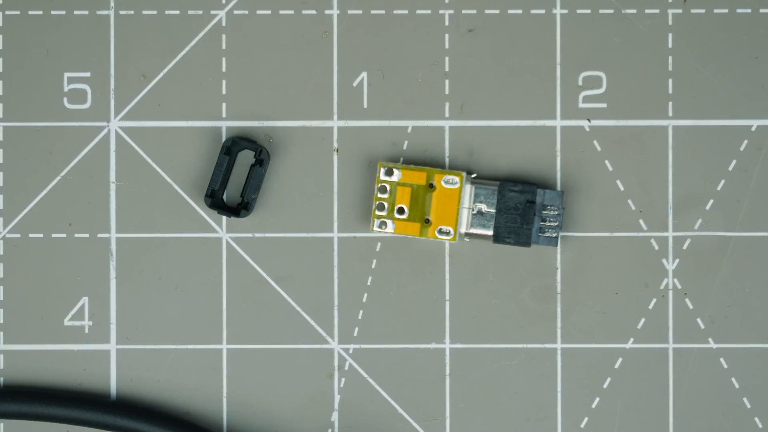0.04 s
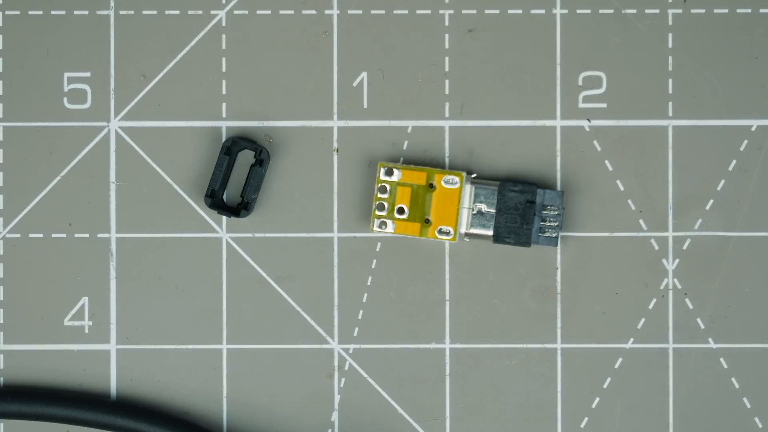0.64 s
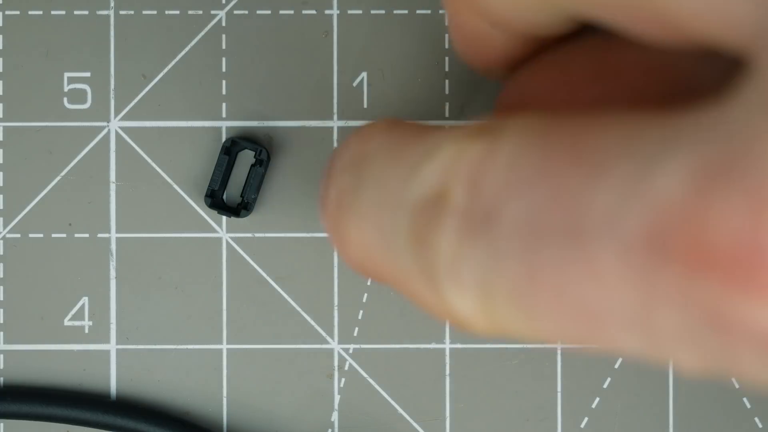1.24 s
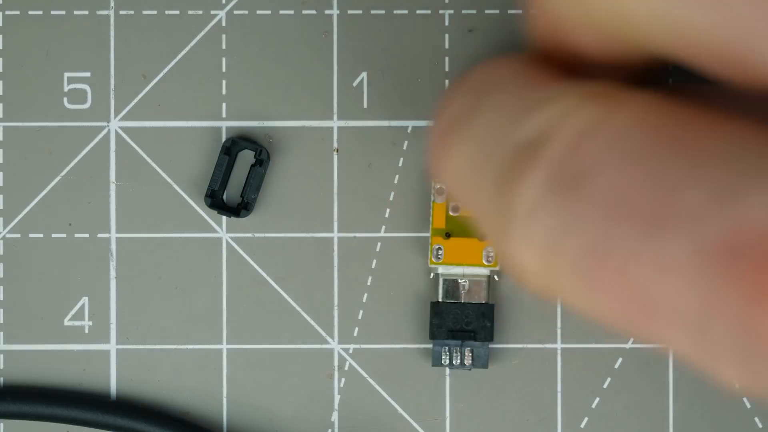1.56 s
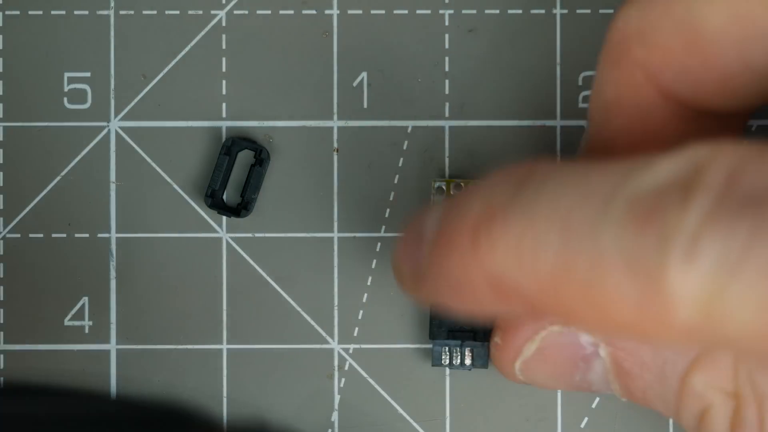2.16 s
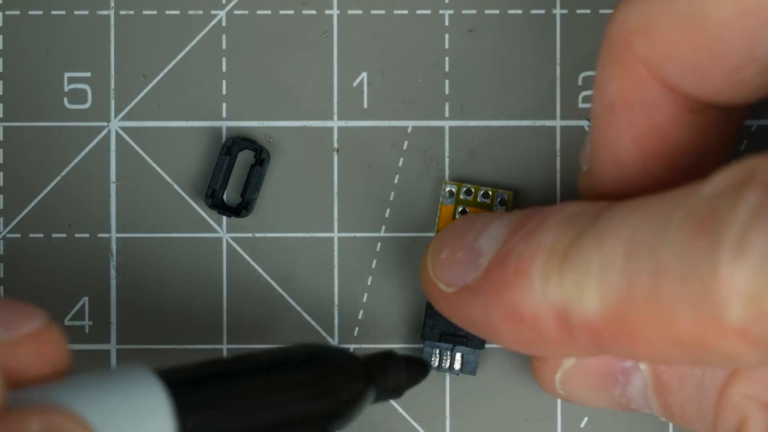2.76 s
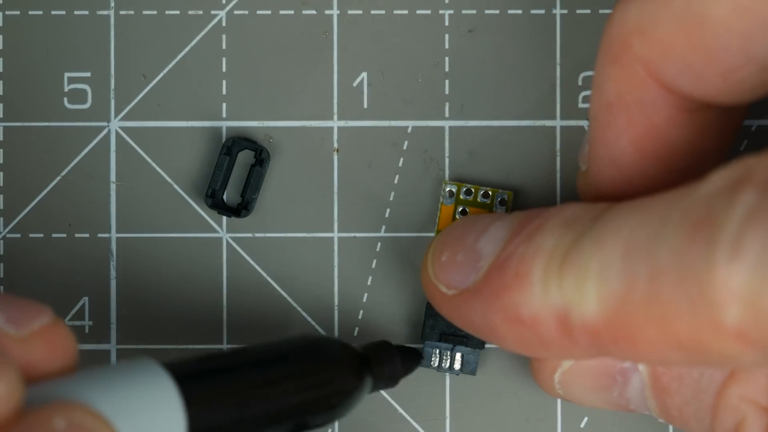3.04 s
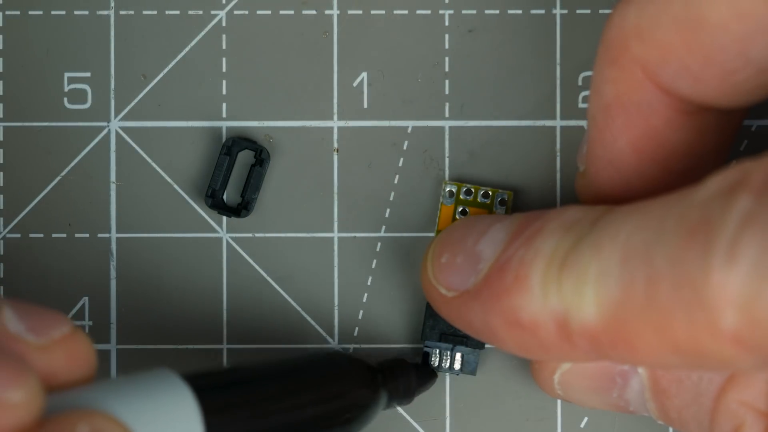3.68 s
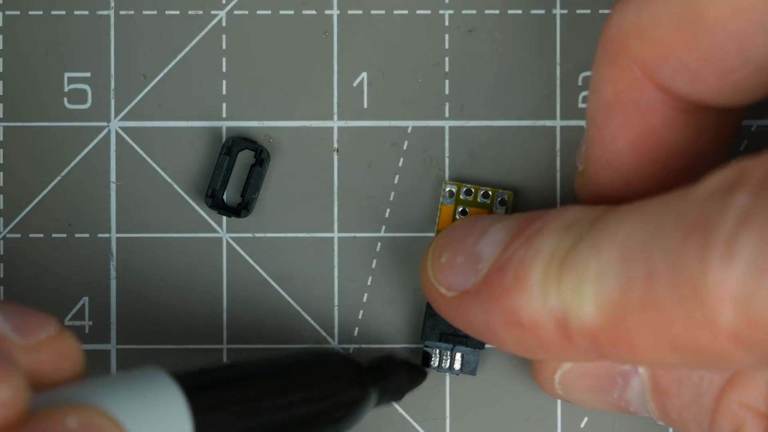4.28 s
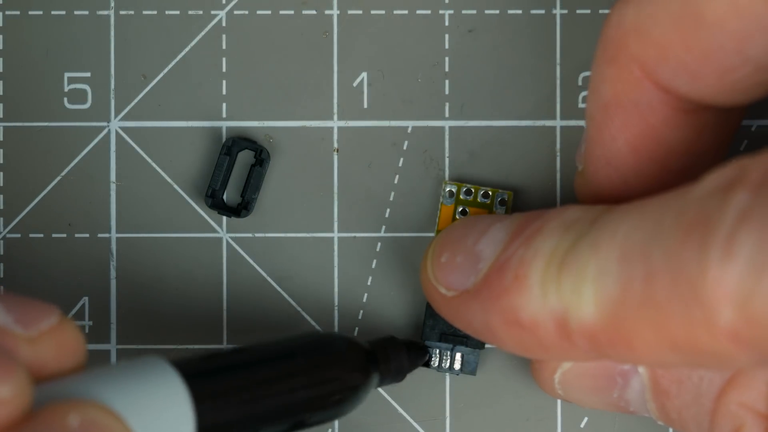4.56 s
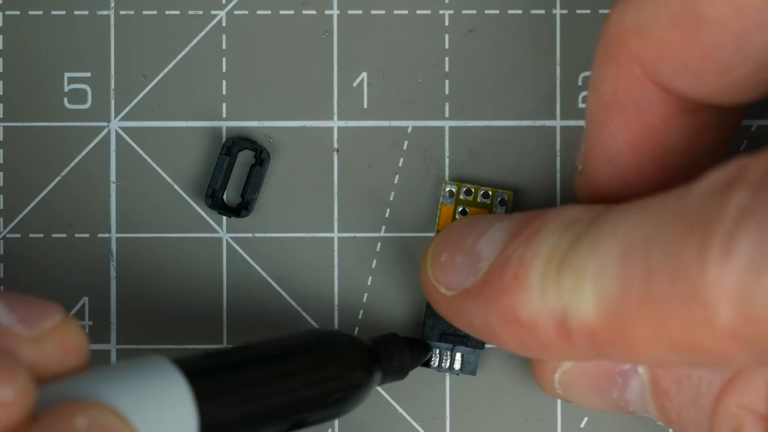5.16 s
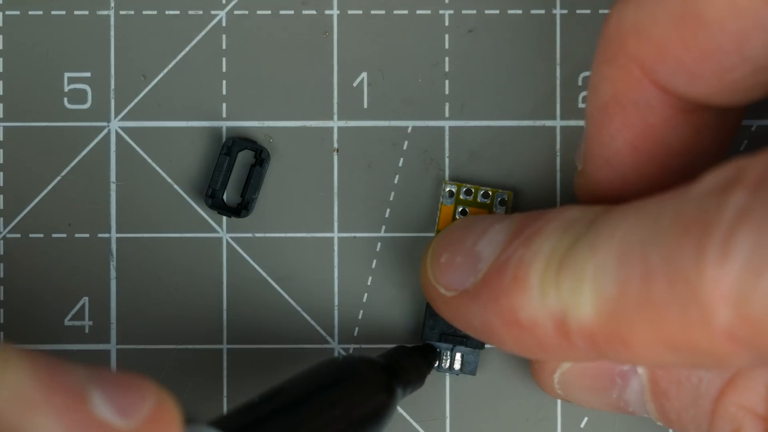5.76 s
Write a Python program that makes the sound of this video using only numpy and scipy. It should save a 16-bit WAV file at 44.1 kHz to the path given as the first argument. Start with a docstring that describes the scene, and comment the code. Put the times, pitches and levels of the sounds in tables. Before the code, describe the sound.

The sounds are close to the microphone, at a desk in a small room with low rumble and faint hiss. After a few light ticks, a marker's cap snaps off at about 0.4 seconds with a sharp click and a low thump, by far the loudest moment. Small rattles, scrapes and brief squeaks of the cap between fingers follow until 0.9 seconds. A tiny plug is turned on a mat, ticking with a slight metallic ring at 1.1 and 1.6 seconds, then more faintly until 2.5. A palm drags softly and hands bump the desk from about 2.4 to 3 seconds. Between 3.6 and 5 seconds the felt tip makes a few faint, scratchy dabs at the plug amid soft arm movements. At 5.6 seconds the marker's barrel gives one dull knock.

```python
"""A desk with a cutting mat in a small, rumbling room, close to the microphone.
A marker's cap snaps off, scrapes the barrel and squeaks between the fingers. A tiny plug is turned and
pressed down, the felt nib dabs at it, and the marker knocks once. Hands rub and bump the desk softly.
Clicks are contacts ringing a body's modes, scrapes are random micro-slips; the room answers both."""
import sys
import numpy as np
from scipy import signal
from scipy.fft import rfft, irfft, next_fast_len
from scipy.io import wavfile
from scipy.ndimage import uniform_filter1d

SR = 44100
rng = np.random.default_rng(int(sys.argv[2]) if len(sys.argv) > 2 else 0)


def transcribe(signal):
    """Save signal, clipped to [-1, 1], as a 16-bit WAV file at the path in sys.argv[1]."""
    frames = np.atleast_2d(signal).T
    limited = np.clip(frames, -1, 1)
    pcm = np.round(limited * 32767).astype(np.int16)
    wavfile.write(sys.argv[1], SR, pcm)


N = 265349
T = np.arange(N) / SR

# contacts: start_s, level_db, bright_hz, spread_oct
CAP_HITS = [(0.064, -39, 4796, 0.22), (0.198, -48.5, 4760, 0.36), (0.3888, -20, 4500, 1.5),
            (0.3903, -12.5, 1840, 0.74), (0.3924, -4, 1500, 1.47), (0.3927, -4, 9200, 0.29),
            (0.3947, -7, 6000, 0.59), (0.3950, -12, 5913, 0.33), (0.3956, -8.5, 4000, 0.34),
            (0.4025, -23, 9095, .4), (0.428, -27.5, 1200, 0.98), (0.490, -31, 1590, 1.3),
            (0.583, -28, 7800, 0.36), (0.595, -28, 7500, .7), (0.6935, -38.5, 2800, 1.23),
            (0.846, -39.5, 4500, 0.45)]  # two ticks, snap over the ridge, rattle
PING_HITS = [(0.2549, -22, 9170, .9), (0.2560, -30, 8266, 0.28)]  # cap shifting in its seat
PLUG_HITS = [(1.1177, -33.5, 2630, 1.9), (1.1306, -33, 8700, 0.22), (1.1327, -29, 4600, 1.1),
             (1.4055, -48, 3000, 0.78), (1.6027, -25, 3100, 1.2), (1.6046, -33, 3860, 1.1),
             (2.025, -51.5, 9040, 0.57), (2.068, -51, 9920, 0.56), (2.337, -49, 1001, 1),
             (2.3505, -42.5, 8420, 0.092), (2.408, -48.5, 1100, 1.5), (2.461, -52.5, 998, 1.02),
             (3.750, -46.5, 4000, 2.3), (4.751, -54.5, 998, .8), (5.618, -47, 5800, 1.46)]  # plug on fingernail, mat and marker
KNOCK_HITS = [(5.6148, -24.5, 1020, 1.22), (5.6187, -32.5, 1240, 1.25), (5.6232, -38.5, 1500, 0.94)]  # barrel

# body resonances: centre_hz, width_hz, level_db
CAP_MODES = [(128.7, 30, -6.5), (496.3, 93, -5), (959, 88, -4), (1250, 110, -8.5), (1500, 110, -7),
             (1877, 73, -3.5), (2140, 300, -1.5), (2650, 300, -5.5), (3570, 160, -9), (3965, 140, -1),
             (4630, 300, -7), (5000, 350, -9.5), (5440, 250, -2), (6200, 310, -3.5), (6350, 200, -12.5),
             (7200, 410, -5.5), (8365, 900, -8), (9600, 130, -2.5), (10660, 900, -7.5),
             (14700, 3700, -13.5)]
PING_MODES = [(5000, 1500, -9), (7500, 520, -5), (7670, 150, 1), (9600, 600, -10.5), (10500, 500, -9.5),
              (12300, 700, -13)]
PLUG_MODES = [(685, 103, 10.5), (2140, 150, -6), (2940, 620, -8.5), (3530, 300, -4), (4000, 250, -17),
              (4820, 360, -2.5), (5600, 400, -4.5), (6810, 320, 5), (8940, 780, -6), (11700, 1000, -9.5)]
BARREL_MODES = [(410, 31, 6.5), (787, 150, -27), (1028, 65, -1.5), (1250, 105, -9.5), (1430, 86, -9.5),
                (1660, 78, -7.5), (1970, 48, -5.5), (3260, 82, -10.5)]
# plug's metal shell: pitch_hz, level_db, t60_s
SHELL_MODES = [(4005, -35.5, 0.54), (7000, -29, 0.33), (8420, -28, 0.15)]

# bell-shaped strokes: centre_s, sigma_s, level_db
FINGER_RUBS = [(0.1, 0.33, -63.5), (0.6, 0.16, -56.5), (1.0, 0.19, -67), (1.8, 0.16, -64.5),
               (2.66, 0.117, -68)]  # on cap and plug
CAP_SCRAPES = [(0.096, 0.003, -59), (0.607, 0.016, -51), (0.695, 0.005, -50), (0.740, 0.007, -50.5),
               (0.762, .005, -61), (0.848, 0.0051, -55), (0.897, 0.0057, -57)]  # along the barrel
CAP_SQUEAKS = [(0.588, 0.0038, -47), (0.609, 0.012, -50.5), (0.697, 0.0027, -41.5)]  # on the fingers
PLUG_SCUFFS = [(1.124, 0.0077, -59), (1.415, .005, -57), (1.515, 0.016, -67.5), (2.349, 0.0038, -57)]  # over the mat
PALM_DRAGS = [(1.84, 0.014, -67), (2.422, 0.017, -58), (2.565, 0.016, -57.5), (2.612, 0.009, -49.5),
              (2.64, 0.0072, -51), (2.75, 0.026, -55), (3.79, 0.058, -72.5)]  # over the mat
NIB_DABS = [(3.642, 0.015, -58.5), (3.754, 0.0061, -47.5), (4.282, 0.009, -54), (4.648, 0.01, -60.5),
            (4.93, 0.0072, -68.5)]  # at the plug
# arm movements: centre_s, sigma_s, desk_db, sleeve_db
ARM_MOVES = [(0.15, 0.14, -53, -59), (0.763, .05, -47, -70), (1.814, 0.078, -51, -65.5),
             (2.713, 0.09, -49.5, -69), (3.206, 0.12, -52.5, -86), (3.775, 0.072, -45, -59.5),
             (4.564, 0.049, -47.5, -75.5), (4.862, 0.068, -53, -65.5), (5.344, 0.055, -50, -71),
             (5.766, .06, -48, -66)]
# low thumps of the desk: start_s, level_db, pitch_hz, t60_s (hand bumps, plus the thumps of the cap's snap and
# the knock)
DESK_BUMPS = [(0.392, -14.5, 116, 0.02), (0.396, -34.5, 67, 0.17), (0.431, -38, 347.4, 0.05),
              (0.692, -30, 55, 0.13), (2.654, -46.5, 125.8, 0.38), (2.766, -41.5, 70.8, 0.35),
              (3.019, -40.5, 61.7, 0.34), (3.764, -51, 273, 0.3), (5.614, -37, 212, 0.016),
              (5.697, -48, 135, 0.24)]

# noise spectra: freq_hz, level_db
HISS_SPECTRUM = [(100, -6), (200, -1.5), (330, -12), (600, -11), (1100, -13.5), (3000, -23.5), (8000, -20),
                 (15500, -20.5)]
RUMBLE_SPECTRUM = [(8, -7.5), (20, 3), (42, -1), (62, -9), (85, -13.5), (120, -19), (200, -33), (400, -74)]
SLEEVE_SPECTRUM = [(50, -34), (120, 1), (190, -3), (280, -3.5), (450, -12), (900, -23.5), (2000, -56.5)]
SKIN_SPECTRUM = [(150, -11.5), (450, -1), (1000, -8), (2300, -11), (5500, -15), (9000, -14.5), (15000, -26)]
SCRAPE_SPECTRUM = [(1500, -25.5), (3200, -15), (4500, -6), (5600, 1.5), (6800, 0.5), (8200, 0.5),
                   (10500, -9), (12000, -18), (16000, -28.5)]
SCUFF_SPECTRUM = [(400, -4), (900, -4), (1600, -6), (2300, 6), (3300, -1.5), (4200, -1.5), (6000, -10.5),
                  (12000, -26.5)]
MAT_SPECTRUM = [(100, -8.5), (250, -7), (360, -2), (440, 11.5), (520, -5), (1000, -12.5), (2500, -28.5),
                (6000, -46.5), (14000, -49)]
NIB_SPECTRUM = [(150, -15), (300, 5.5), (900, 7.5), (2000, -14), (3500, -7), (5000, -19.5), (6800, -5),
                (8000, -9.5), (9300, 4), (10500, -9), (12500, -10), (16000, -18)]

# room decay: freq_hz, t60_s
ROOM_DECAY = [(150, 0.25), (800, 0.47), (2000, 0.5), (5500, 0.33), (9000, 0.31), (15000, .33)]
# standing waves over the desk: freq_hz, gain_db
STANDING_WAVES = [(100, 0.5), (135, -2.5), (215, -0.5), (250, 1), (300, 1.5), (338, -4), (390, 3.5),
                  (440, 1), (505, -3), (585, 2.5), (680, -3), (790, 1), (1000, 0.5)]


def amp(db):
    """Decibels to gain."""
    return 10 ** (np.asarray(db) / 20)


def unit_rms(x):
    """Scale to rms 1."""
    return x / np.sqrt(np.mean(x ** 2) + 1e-20)


def log_interp(points, hz):
    """Interpolate (freq_hz, value) points on a log frequency axis."""
    freq_hz, values = np.transpose(points)
    return np.interp(np.log(hz + 1), np.log(freq_hz + 1), values)


def filtered(x, response):
    """Zero-phase filter with gain response(hz)."""
    size = next_fast_len(N + SR // 2)
    return irfft(rfft(x, size) * response(np.fft.rfftfreq(size, 1 / SR)), size)[:N]


def coloured(x, spectrum):
    """Filter by a (freq_hz, level_db) curve."""
    return filtered(x, lambda hz: amp(log_interp(spectrum, hz)))


def noise(spectrum):
    """Coloured noise, rms 1."""
    return unit_rms(coloured(rng.standard_normal(N), spectrum))


def add(track, start_s, sound):
    """Mix a sound in at start_s."""
    part = track[round(start_s * SR):][:len(sound)]
    part += sound[:len(part)]


def swells(strokes, rest_db):
    """Gain over time: bell-shaped swells above a resting level."""
    power = sum(amp(db) ** 2 * np.exp(-((T - centre_s) / sigma_s) ** 2)
                for centre_s, sigma_s, db in strokes)
    return np.sqrt(amp(rest_db) ** 2 + power)


def ring(modes, bright_hz, spread_oct, rolloff, size=4096):
    """Body response, peak 1, to a contact favouring the modes near bright_hz."""
    hz = np.fft.rfftfreq(size, 1 / SR) + 1
    power = sum(amp(db) ** 2 * (hz * width_hz) ** 2
                / ((centre_hz ** 2 - hz ** 2) ** 2 + (hz * width_hz) ** 2)
                for centre_hz, width_hz, db in modes)
    contact = (1 + (np.log2(hz / bright_hz) / spread_oct) ** 2) ** -rolloff
    cepstrum = irfft(np.log(np.sqrt(power) * contact + 1e-9))
    wave = irfft(np.exp(rfft(2 * cepstrum[:size // 2], size)))  # minimum phase
    return wave / np.abs(wave).max()


def echoes(near_db, near_t60_s, room_db):
    """Two impulse responses: direct sound plus scatter from things on the desk; room tail."""
    hz = np.fft.rfftfreq(256, 1 / SR)
    t = T[:SR // 2]
    frames_s = t[::128]
    decay = amp(-60 * frames_s / log_interp(ROOM_DECAY, hz)[:, None])
    bins = rng.standard_normal((len(hz), 2 * len(frames_s))).view(complex)
    tail = signal.istft(bins * decay)[1]
    t = t[:len(tail)]
    tail *= 1 - np.exp(-t / 0.0033)
    scatter = rng.standard_normal(len(t)) * amp(-60 * t / near_t60_s) * (1 - np.exp(-t / 0.0006))
    near = (t == 0) + amp(near_db) * scatter / np.linalg.norm(scatter)
    return near, amp(room_db) * tail / np.linalg.norm(tail)


def clicks(hits, modes, rolloff, grind_db, near_db, near_t60_s, room_db, blur):
    """Each contact strikes, grinds for about 1 ms and rings the body."""
    out, t = np.zeros(N), T[:128]
    # the room hears all sides of the body at once: each mode widens by blur * hz
    blurred = [(hz, width_hz + hz * blur, db + 10 * np.log10(width_hz / (width_hz + hz * blur)))
               for hz, width_hz, db in modes]
    previous_s = -np.inf
    for start_s, db, bright_hz, spread_oct in hits:
        if start_s - previous_s > 0.02:  # closer contacts share their echoes
            near, tail = echoes(near_db, near_t60_s, room_db)
        previous_s = start_s
        grind = rng.standard_normal(len(t)) * t * np.exp(-(t / 0.0007) ** 2)
        force = (t == 0) + amp(grind_db) * grind / np.linalg.norm(grind)
        direct = np.convolve(force, ring(modes, bright_hz, spread_oct, rolloff))
        diffuse = ring(blurred, bright_hz, spread_oct, rolloff)
        diffuse *= np.linalg.norm(direct) / np.linalg.norm(diffuse)
        add(out, start_s, amp(db) * signal.fftconvolve(direct, near))
        add(out, start_s, amp(db) * signal.fftconvolve(diffuse, tail))
    return out


def friction(strokes, spectrum, slips_per_s, room_db):
    """Random micro-slips, coloured by the surface, swell and fade with each stroke."""
    force = np.zeros(N)
    for centre_s, sigma_s, db in strokes:
        u = np.arange(-np.pi, np.pi, 1 / (sigma_s * SR))
        add(force, centre_s - np.pi * sigma_s, amp(db) * np.exp(-u ** 2 / 2))
    slips = rng.standard_normal(N) * (rng.random(N) < slips_per_s / SR)
    rub = force * unit_rms(coloured(slips, spectrum))
    return signal.fftconvolve(rub, sum(echoes(near_db=-20, near_t60_s=0.062, room_db=room_db)))[:N]


def background(hiss_db=-68, rumble_db=-57):
    """Steady hiss over the room's low rumble."""
    return amp(hiss_db) * noise(HISS_SPECTRUM) + amp(rumble_db) * noise(RUMBLE_SPECTRUM)


def hands():
    """Arms shake the desk and brush a sleeve over it; fingers rub, the palm drags."""
    moves = np.array(ARM_MOVES)
    desk = swells(moves[:, [0, 1, 2]], rest_db=-59) * noise(RUMBLE_SPECTRUM)
    sleeve = swells(moves[:, [0, 1, 3]], rest_db=-66) * noise(SLEEVE_SPECTRUM)
    skin = swells(FINGER_RUBS, rest_db=-74.5) * noise(SKIN_SPECTRUM)
    palm = friction(PALM_DRAGS, MAT_SPECTRUM, slips_per_s=1300, room_db=-5.5)
    return desk + sleeve + skin + palm


def cap():
    """The cap pings in its seat, snaps over its ridge in quick contacts and scrapes off."""
    ping = clicks(PING_HITS, PING_MODES, rolloff=1.0, grind_db=-10.5,
                  near_db=-7, near_t60_s=0.04, room_db=-11, blur=0.06)
    snap = clicks(CAP_HITS, CAP_MODES, rolloff=1.05, grind_db=-7.5,
                  near_db=-12.5, near_t60_s=0.1, room_db=-17.5, blur=0.11)
    scrape = friction(CAP_SCRAPES, SCRAPE_SPECTRUM, slips_per_s=1100, room_db=-7.5)
    return ping + snap + scrape


def desk_bumps():
    """A leaning hand, the cap's snap or the marker's knock sets off a low, damped swing of the desk top."""
    out, t = np.zeros(N), T[:SR // 2]
    for start_s, db, hz, t60_s in DESK_BUMPS:
        attack = 1 - np.exp(-t * hz * 2)
        add(out, start_s, attack * amp(db - 60 * t / t60_s) * np.sin(2 * np.pi * hz * t))
    return out


def cap_squeaks(pitch_hz=1980):
    """Skin sticks and slips on the cap: a ragged tone that sags as each slip runs out."""
    out = np.zeros(N)
    for centre_s, sigma_s, db in CAP_SQUEAKS:
        u = np.arange(-np.pi, np.pi, 1 / (sigma_s * SR))
        jitter = unit_rms(uniform_filter1d(rng.standard_normal(len(u)), size=40))
        hz = pitch_hz * (1 - 0.0476 * np.tanh(u) + 0.078 * jitter)
        tone = np.sqrt(2) * np.sin(2 * np.pi * np.cumsum(hz) / SR)
        add(out, centre_s - np.pi * sigma_s, amp(db) * np.exp(-u ** 2 / 2) * tone)
    return signal.fftconvolve(out, sum(echoes(near_db=-27, near_t60_s=0.039, room_db=-11.5)))[:N]


def plug():
    """The plug's little board ticks as it is turned; its edge scuffs the mat."""
    ticks = clicks(PLUG_HITS, PLUG_MODES, rolloff=1.11, grind_db=-2.5,
                   near_db=-1.5, near_t60_s=0.063, room_db=-7.5, blur=0.13)
    scuffs = friction(PLUG_SCUFFS, SCUFF_SPECTRUM, slips_per_s=4000, room_db=-7)
    return ticks + scuffs


def plug_shell():
    """Each contact leaves the thin metal shell ringing, favouring modes near bright_hz."""
    out, t = np.zeros(N), T[:SR // 2]
    for start_s, db, bright_hz, spread_oct in PLUG_HITS:
        for hz, mode_db, t60_s in SHELL_MODES:
            coupling = 1 / (1 + (np.log2(hz / bright_hz) / spread_oct) ** 2)
            tone = np.sin(2 * np.pi * (hz * t + rng.random()))
            add(out, start_s, coupling * amp(db + mode_db - 60 * t / t60_s) * tone)
    return out


def nib():
    """Felt scratches across the plug's end in dense slips."""
    return friction(NIB_DABS, NIB_SPECTRUM, slips_per_s=12000, room_db=-8.5)


def barrel_knock():
    """Three quick contacts ring the marker's barrel as one dull knock."""
    return clicks(KNOCK_HITS, BARREL_MODES, rolloff=1.85, grind_db=-11.5,
                  near_db=-12, near_t60_s=0.066, room_db=-8, blur=0.09)


def scene():
    """Mono mix; standing waves colour the hands and background."""
    sustained = coloured(hands() + background(), STANDING_WAVES)
    marker = cap() + cap_squeaks() + barrel_knock()
    return (sustained + marker + desk_bumps() + plug() + plug_shell() + nib())[None]


def record(dry):
    """Brick-wall low-pass."""
    cutoff_hz = 15800
    return np.array([filtered(x, lambda hz: hz < cutoff_hz) for x in dry])


dry = scene()
out = record(dry)
transcribe(out)
```